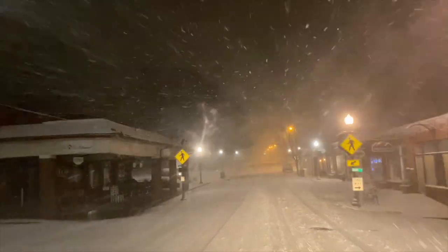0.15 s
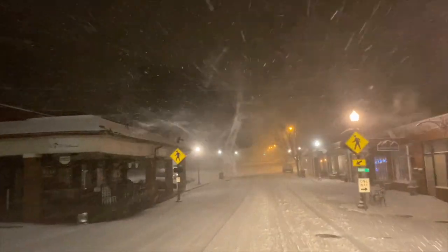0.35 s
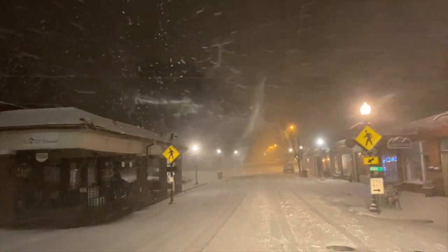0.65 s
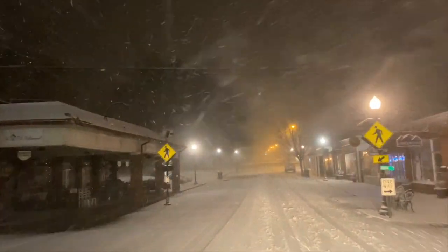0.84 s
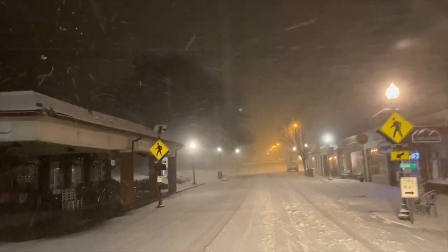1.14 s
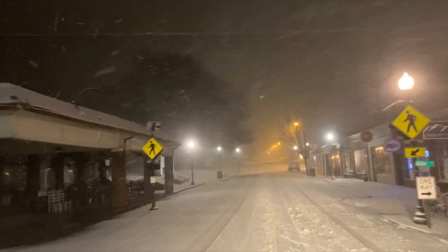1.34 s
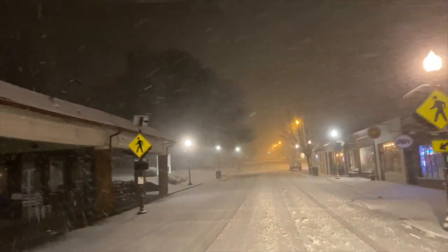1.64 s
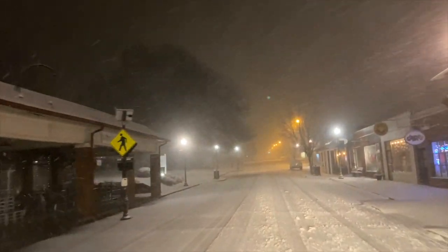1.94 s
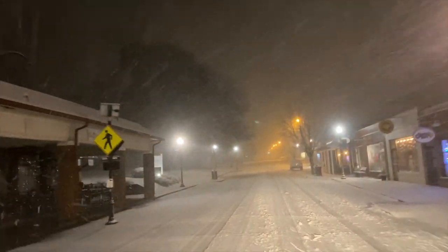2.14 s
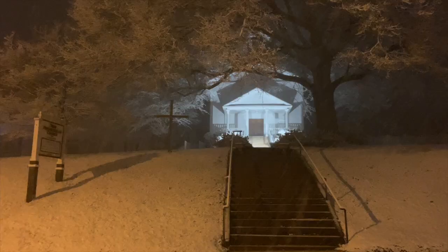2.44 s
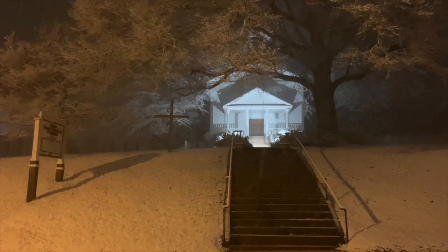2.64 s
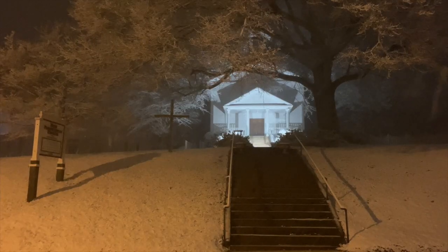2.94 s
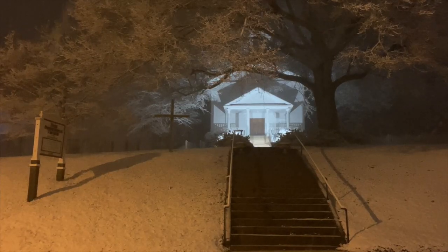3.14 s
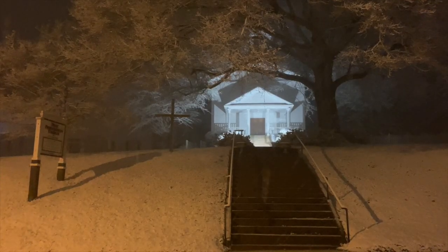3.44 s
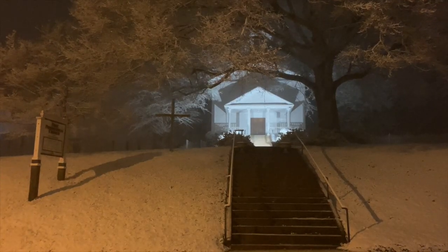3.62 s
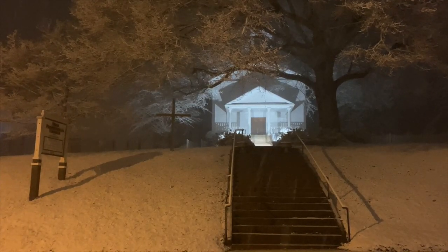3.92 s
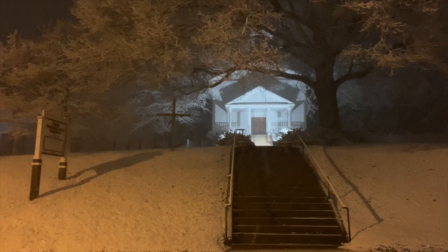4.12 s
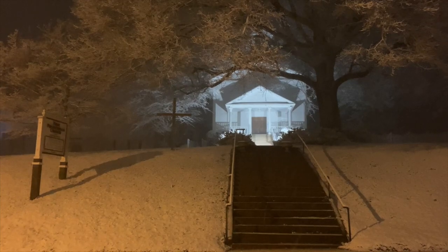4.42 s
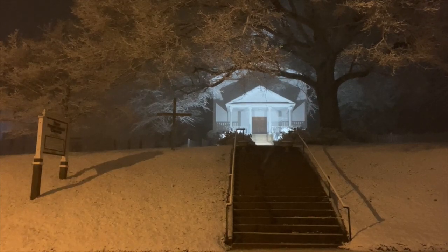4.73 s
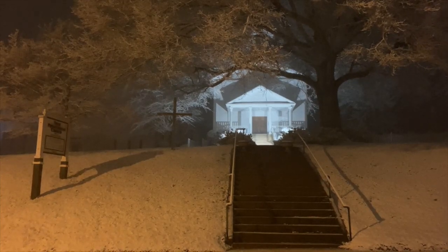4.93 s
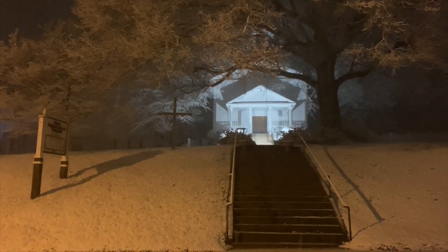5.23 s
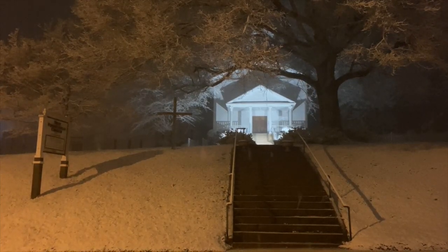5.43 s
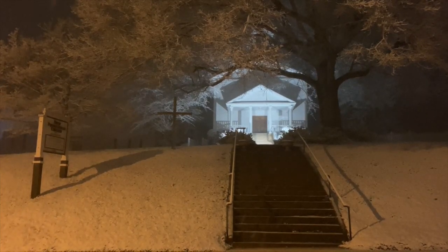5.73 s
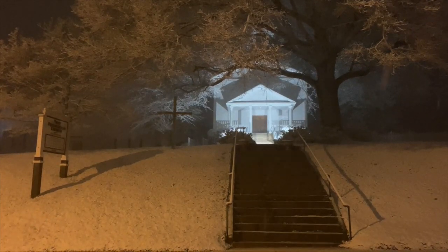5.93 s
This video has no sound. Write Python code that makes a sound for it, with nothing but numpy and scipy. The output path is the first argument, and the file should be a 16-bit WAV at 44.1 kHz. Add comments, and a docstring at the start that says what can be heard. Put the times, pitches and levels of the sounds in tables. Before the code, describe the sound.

Rough gusts thump and crackle over the mic during a snowstorm drive, abruptly replaced by a parked car's low idling hum and soft hush.

```python
"""Night snowstorm from a car

Place: an open window of a moving car. Microphone: the two ports of a phone, out in the wind.
Wind buffets the ports (noise bands driven by gusts and eddies), air hisses past and sleet ticks close by.
At 2.461 s it cuts hard to the parked car: a four-cylinder idle, summed from orders of the engine cycle,
over the noise hush of a snowy street. Sparse sleet and faint flakes still tick."""
import sys
import numpy as np
from scipy import signal
from scipy.fft import rfft, irfft, next_fast_len
from scipy.io import wavfile
from scipy.ndimage import uniform_filter1d

SR = 44100
rng = np.random.default_rng(int(sys.argv[2]) if len(sys.argv) > 2 else 0)


def persist_wave(psi):
    """Save psi, clipped to +-1, as 16-bit WAV."""
    counts = np.round(np.clip(psi, -1, 1) * 32767).astype(np.int16)
    wavfile.write(sys.argv[1], SR, np.atleast_2d(counts).T)


N = 267687
CUT_S = 2.461  # moving car before, parked car after

# wind on the ports: [t/s, level/dB, treble boost/dB]
WIND_GUSTS = [(0.0, -15.5, 1.5), (0.08, -16.5, 0), (0.14, -23, 6.5), (0.17, -11.5, -2.5), (0.3, -17, 4.5),
              (0.37, -22.5, 4.5), (0.43, -12.5, -5), (0.47, -30, 10.5), (0.52, -10.5, -4.5),
              (0.55, -22.5, 10.5), (0.6, -20, -1), (0.77, -24.5, 9), (0.84, -17, -4), (0.88, -27.5, 8),
              (1.04, -14.5, -4.5), (1.07, -27, 11.5), (1.14, -9.5, 1), (1.27, -17, -0.5), (1.4, -14, -4.5),
              (1.51, -21, 2.5), (1.64, -19.5, -5), (1.7, -26.5, 0), (1.76, -18, 0.5), (1.9, -21, -6),
              (2.07, -23.5, -2.5), (2.17, -18.5, -2.5), (2.25, -15, 0.5), (2.31, -20.5, 2), (2.35, -24, -4),
              (2.46, -27, -9)]
# bass of the wind, swelling on its own: [t/s, level/dB]
WIND_RUMBLE = [(0.0, -9), (0.09, -9), (0.14, -14.5), (0.32, -9.5), (0.38, -24.5), (0.44, -10.5),
               (0.48, -26.5), (0.53, -4), (0.61, -29), (0.67, -1), (0.78, -32), (0.85, -10), (0.88, -17.5),
               (1.15, -15), (1.21, -10.5), (1.62, -19), (1.68, -29), (1.82, -9), (1.88, -30), (1.93, -19.5),
               (2.13, -27.5), (2.3, -22.5), (2.46, -22)]
# relative spectrum of the wind: [f/Hz, density/dB per Hz]
WIND_SPECTRUM = [(12, -51.5), (25, -24), (41, -6.5), (65, 1.5), (110, -2), (156, -1.5), (202, -5.5),
                 (285, -6.5), (420, -11), (570, -10.5), (752, -14.5), (950, -19), (1220, -22), (1610, -24),
                 (1980, -33.5), (5000, -55), (6500, -68.5), (11000, -120)]
# eddies that burst on a port: [t/s, peak level/dB, brightness/dB, left minus right/dB, length/s]
PORT_EDDIES = [(0.007, -15.5, -6.5, 1, 0.052), (0.031, -8, -32, 9, 0.033), (0.072, 4, -15, -1.5, 0.021),
               (0.092, -5, -40, 16, 0.045), (0.152, -4, -6.5, -10.5, 0.019), (0.164, -1, -7.5, 0, 0.014),
               (0.188, -11, -31, 17, 0.069), (0.191, -8, -27, 0, 0.012), (0.248, -6, -5, -2, 0.03),
               (0.257, -14, -10, -2, 0.014), (0.288, -6, -12, 0, 0.042), (0.331, -12, -38, 36, 0.1),
               (0.37, -14, -15, -2, 0.02), (0.413, -1.5, -32, 17, 0.047), (0.433, -4, -18, -11, 0.018),
               (0.469, -18, -12, 2, 0.033), (0.511, -4.5, -20, 11, 0.018), (0.562, -8.5, -26, 2, 0.05),
               (0.585, -5.5, -20, -4, 0.025), (0.626, -4.5, -22, 30, 0.0077), (0.655, -10, -8, 4, 0.013),
               (0.662, -14.5, -1.5, 1, 0.029), (0.716, -6.5, -7.5, 5, 0.021), (0.75, -19, -11, 0, 0.013),
               (0.81, -19, -30, 4, 0.02), (0.904, -12, -16, 1, 0.018), (1.013, -7, -27, 4, 0.027),
               (1.078, -4.5, -24, -6.5, 0.071), (1.145, -7, -8, -3, 0.026), (1.171, -1.5, -8.5, 8.5, 0.016),
               (1.181, 1, -5, 8.5, 0.009), (1.193, -3.5, -3.5, 14, 0.014), (1.207, -2, -5, 12.5, 0.0074),
               (1.215, 1, -2, 10.5, 0.007), (1.223, -2, -8, 11, 0.007), (1.233, -9, -1, 11, 0.0094),
               (1.254, -7, -4, 3, 0.012), (1.275, -2.5, -9, 6.5, 0.011), (1.289, -9, -20, 6, 0.016),
               (1.325, -9, -7, 12, 0.012), (1.339, -4.5, -6, 14, 0.023), (1.354, -6, -5.5, 14, 0.029),
               (1.383, -10, -6, 16, 0.018), (1.422, -14.5, -8, 18, 0.087), (1.476, -10.5, -2.5, 17, 0.0057),
               (1.538, -5.5, -1.5, 15, 0.016), (1.552, -8, -15, 13, 0.031), (1.577, -18, -13, 13, 0.022),
               (1.599, -11, -11, 15, 0.015), (1.611, -11.5, -4, 15, 0.025), (1.629, -17, -8, 13, 0.011),
               (1.679, -9.5, -8.5, 12, 0.015), (1.704, -17, -4, 11, 0.013), (1.732, -10.5, -21, 6.5, 0.025),
               (1.774, -20, -2, 13, 0.058), (1.85, -11, -19, 5.5, 0.041), (1.922, -14.5, -8, 7.5, 0.058),
               (1.985, -18.5, 5, 2.5, 0.026), (2.046, -17, -8, 9, 0.02), (2.101, -13, -12, 9.5, 0.05),
               (2.11, -10.5, -15, 18, 0.018), (2.213, -10, -12, 12.5, 0.009), (2.233, -7, -10, 15, 0.016),
               (2.254, -14, -4, 6.5, 0.015), (2.274, -14, -4, 7, 0.019), (2.307, -16.5, -5, 3, 0.023),
               (2.371, -12.5, -11, 9, 0.033), (2.435, -20, 0, 5, 0.019)]
# air stream past the car: [t/s, level/dB, boost of the highest treble/dB]
AIR_STREAM = [(0, -42.5, 4), (.3, -40.5, 4), (.6, -45, 3.5), (.66, -48, -2), (.78, -48, -0.5),
              (.81, -41, 0), (.9, -41.5, -6), (1.05, -40.5, 0), (1.2, -41.5, -3), (1.6, -44, -2.5),
              (2.05, -40, -4.5), (2.3, -42.5, -5.5), (2.46, -42.5, -2.5)]
# relative spectrum of the air stream: [f/Hz, density/dB per Hz]
HISS_SPECTRUM = [(900, -35), (1700, -5), (2300, -12.5), (2800, -15), (3500, -14.5), (4800, -17),
                 (5500, -19.5), (6300, -18.5), (7200, -20), (8400, -17), (9500, -23.5), (10500, -27.5),
                 (11000, -33.5), (11500, -48), (13000, -54), (14500, -46.5), (16000, -58)]
# sleet ticks: [t/s, peak level before the stereo lean/dB, lowest f/Hz, highest f/Hz,
# left minus right/dB, crumble decay/s, crumble size against the click]
SLEET_TICKS = [(0.119, -32, 7000, 12000, 2, .0004, 0.1), (0.133, -29, 7000, 12000, -2, .0004, .15),
               (0.173, -31, 7500, 11000, 0, .0006, .2), (0.209, -33, 7500, 11000, 0, .0004, .15),
               (0.313, -26, 8000, 13000, 2, 0.0009, 0.3), (0.327, -10, 2010, 13100, 4, 0.0012, 0.13),
               (.433, -30, 7000, 14000, 0, 0.00054, 0.33), (0.443, -39, 8000, 14000, 0, .0004, .15),
               (0.518, -27.5, 6000, 13000, 0, .0006, 0.1), (0.6261, -15, 5970, 10500, -2, 0.0006, .2),
               (0.6268, -5.5, 350, 4000, 12, 0.001, .09), (0.628, -9, 150, 700, 0.5, 0.002, .05),
               (0.628, -17, 4800, 10500, 3, 0.0008, 0.43), (0.646, -45, 8010, 12000, 2, .0004, 0.2),
               (0.661, -21.5, 1987, 5530, 9, .0004, 0.14), (0.6927, -15.5, 900, 6900, 2, 0.00035, 0.47),
               (0.797, -25, 3000, 9700, -4, 0.0011, 0.33), (1.039, -18, 2980, 11100, 4, 0.0005, 0.26),
               (1.045, -20, 2000, 8000, 8, 0.0025, 0.24), (2.0627, -2.5, 2340, 8100, 7, 0.00053, 0.16),
               (2.4004, -17, 1270, 2200, 6.5, 0.002, 0.17), (2.4007, -10, 3000, 11300, 10.5, 0.0007, 0.12),
               (2.4705, -52, 3500, 11000, 0, 0.0006, 0.2), (2.7055, -34.5, 450, 4270, 9, 0.001, 0.12),
               (2.708, -42, 1000, 4600, 8, 0.0008, 0.12), (2.7058, -38, 350, 800, 1, 0.002, 0.1),
               (2.7081, -42, 600, 3000, 13, 0.00082, 0.15), (2.797, -72, 7900, 9400, -11, .001, 0.51),
               (2.848, -68, 7900, 9440, -10.5, .001, .4), (3.078, -63, 8000, 9000, -6.5, 0.0016, 0.37),
               (3.338, -56, 900, 6040, 3, .002, .35), (3.702, -63.5, 4500, 9450, -7, 0.00074, .3),
               (5.508, -63, 7860, 11000, -6, .001, 0.35), (5.522, -59.5, 1500, 4500, -0.5, .0008, 0.4),
               (5.757, -71, 5500, 6500, -5.5, .012, 3), (5.772, -69, 5500, 6600, -4.5, .01, 3),
               (5.853, -68, 7860, 10500, -8.5, 0.00091, 0.43)]
# phone case and port, as heard on the sleet: [f/Hz, level/dB]
CASE_RESPONSE = [(7000, -2.5), (8200, 1.5), (9300, 0), (10000, -2.5), (10600, -5.5), (11200, -14),
                 (12000, -16), (16000, -22.5)]
# speed of the idle: [t/s, engine cycles per s]
IDLE_SPEED = [(2.46, 15.65), (2.9, 15.64), (3.2, 15.57), (3.8, 15.61), (4.2, 15.57), (4.8, 15.59),
              (5.05, 15.5), (5.2, 15.62), (5.5, 15.73), (6.07, 15.71)]
# orders of the engine: [multiple of the engine cycle, relative level/dB]
ENGINE_ORDERS = [(2, -16.5), (3, -26), (4, 1), (5, -13), (6, -3.5), (7, -17.5), (8, -18), (9, -27),
                 (10, -14.5), (12, -13), (14, -26), (15, -30), (20, -32)]
# heavier beats of the engine: [t/s, boost/dB, length/s]
HEAVY_BEATS = [(3.231, 7, 0.022), (3.41, 2, 0.018), (5.467, 4.5, 0.011), (6.027, 1.5, 0.022)]
# relative spectrum of the street hush: [f/Hz, density/dB per Hz]
STREET_SPECTRUM = [(16, -27.5), (31, -13.5), (68, -12), (140, -15.5), (200, -21), (250, -19), (325, -21.5),
                   (410, -27), (540, -26.5), (750, -32), (1000, -35), (1600, -41.5), (2500, -46.5),
                   (4000, -51), (4800, -57.5), (6000, -59.5), (7500, -67), (8100, -61.5), (8800, -66),
                   (11400, -78), (12000, -72), (12600, -82), (14500, -105)]
# likeness of the two ports, moving and parked: [f/Hz, share 0-1]
MOVING_LIKENESS = [(200, .965), (350, .9), (600, .5), (800, .45), (1050, .7), (1600, .35), (3000, .4),
                   (6000, .6), (9500, .87)]
PARKED_LIKENESS = [(100, 1), (260, .88), (500, 0.45), (750, .5), (1500, .3), (2500, 0.2), (6000, 0.25),
                   (10000, .05)]
# phase of left over right, moving and parked: [f/Hz, phase/rad]
MOVING_PHASE = [(0, 0), (260, -.05), (430, -.4), (700, -2.8), (1050, -4.7), (2400, -5.6), (4500, -5.7),
                (6030, -5.9), (7750, -8.3), (9500, -11.7), (10800, -13.6)]
PARKED_PHASE = [(0, 0), (340, -.2), (780, -3.3), (1460, -2.6), (2410, -5.2), (3100, -6.1)]
# stereo tilt by pitch, moving and parked: [f/Hz, left minus right/dB]
MOVING_TILT = [(100, -1), (400, -0.9), (800, 0), (3000, 1), (6000, 4.5), (8000, 0), (10500, -0.5),
               (12500, -4.5)]
PARKED_TILT = [(60, 7), (110, -6), (190, -8.5), (340, 2.5), (600, -2), (1070, -2.5), (1910, 0), (3400, 1.5),
               (6060, 0.5), (10800, -11)]

RUMBLE_HZ, TREBLE_HZ = (65, 160), (450, 2480)  # bass fades into the gust; treble boost grows to full
TURN_S, TURN_LENGTH_S = 1.11, 0.061  # the wind swings round to the left port
LEFT_BEFORE_DB, LEFT_AFTER_DB = -3.5, 9.5  # left minus right, before it is shared out by pitch
EDDY_CREST_DB, USUAL_BRIGHT_DB = 3.5, -11.5  # peak of an eddy over its mean level; brightness of plain wind
SLEET_EVEN_HZ = (6500, 8450)  # over this range the left lean of a tick fades out
IDLE_DB, STREET_DB = -38, -50
FIRING_S = 2.6241  # the engine cycle starts at zero phase here
FLAKES_PER_S = 4
FLAKE_DB, FLAKE_SCATTER_DB, FLAKE_LEFT_DB = -73, 2.5, -10  # peak, its spread, left minus right
CEILING, TOP_HZ = .93, 15900  # phone: level that peaks bend towards, top of its band


def buffet(t):
    """Turbulence on the ports: every band follows the gust, bursts with the eddies and churns at random."""
    s, level_db, boost_db = np.transpose(WIND_GUSTS)
    gust_db, treble_db = np.interp(t, s, level_db), np.interp(t, s, boost_db)
    rumble_db = np.interp(t, *np.transpose(WIND_RUMBLE))
    turn_ends = (TURN_S - TURN_LENGTH_S / 2, TURN_S + TURN_LENGTH_S / 2)
    pan_db = np.interp(t, turn_ends, (LEFT_BEFORE_DB, LEFT_AFTER_DB))

    noise = unit(colour(rng.standard_normal((2, len(t))), WIND_SPECTRUM))
    air = ports(noise, MOVING_LIKENESS, MOVING_PHASE, MOVING_TILT)
    _, eddy_db, bright_db, left_db, _ = np.transpose(PORT_EDDIES)
    humps = np.array([hump(t, start - .001, length) ** 2 for start, *_, length in PORT_EDDIES])
    churn = np.tanh(0.55 * walk(len(t), 170))
    spits = np.tanh(0.33 * walk(len(t), 450))
    thumps = np.tanh(0.67 * walk(len(t), 35))
    side = np.array([[.35], [-.65]])  # left and right share of a lean

    centres = 40 * 2 ** np.arange(0, 7.1, 1 / 3)
    out = 0
    for hz, band in zip(centres, bands(air, centres)):
        deep = np.interp(np.log(hz), np.log(RUMBLE_HZ), (1, 0))
        sharp = np.interp(np.log(hz), np.log(TREBLE_HZ), (0, 1))
        # only short wavelengths differ between the ports
        apart = np.interp(hz, (700, 900), (0, 1)) * side
        bright = np.interp(hz, (900, 2500), (0, 1))
        reach = np.interp(hz, (80, 450), (0, 1))

        # doubled dB, since these are powers
        wind_db = deep * rumble_db + (1 - deep) * gust_db + sharp * treble_db + apart * pan_db
        burst_db = eddy_db - EDDY_CREST_DB + bright * (bright_db - USUAL_BRIGHT_DB) + apart * left_db
        power = undb(2 * wind_db) + (reach * undb(2 * burst_db)) @ humps

        churn_db = np.interp(hz, (60, 500, 3000), (4, 4.5, 4.5)) * churn
        churn_db = churn_db + 1.3 * walk(len(t), hz / 16 + 6)
        # the largest swirls thump through all the bass at once
        churn_db = churn_db + np.interp(hz, (120, 300), (2.5, 0)) * thumps
        # the smallest swirls spit in very short bursts
        churn_db = churn_db + np.interp(hz, (900, 2500), (0, 7.5)) * spits
        out = out + band * np.sqrt(power) * undb(churn_db)
    return out


def engine(t):
    """Idle: orders of the engine cycle, each wavering as firings differ, and a few heavier beats."""
    cycles = np.cumsum(np.interp(t, *np.transpose(IDLE_SPEED)) / SR)
    cycles = cycles - np.interp(FIRING_S, t, cycles)
    hum = 0
    for k, db in ENGINE_ORDERS:
        waver = 1 + .07 * walk(len(t), 12) + .07j * walk(len(t), 12)
        # the exhaust delays higher orders by a growing angle
        turning = np.exp(2j * np.pi * k * cycles - 1j * k ** 2 / 5)
        hum = hum - undb(db) * np.real(waver * turning)
    hum = unit(hum) * undb(IDLE_DB)
    for s, db, length in HEAVY_BEATS:
        hum = hum * undb(db * np.exp(-((t - s) / length) ** 2 * 2))
    return hum * undb([[-.5], [.5]])  # right port 1 dB louder


def sleet():
    """Each grain is a click with a tiny crumble, ringing in its own band and heard through the case."""
    out = np.zeros((2, N))
    t = (np.arange(1024) - 256) / SR
    hz = np.arange(513) * SR / 1024
    turn = np.exp(-1j * np.interp(hz, *np.transpose(MOVING_PHASE)))
    tilt = undb(on_log(hz, MOVING_TILT[-2:]) / 2)  # only the treble end of the tilt
    noises = rng.standard_normal((len(SLEET_TICKS), 2, 1024))
    for (s, db, low_hz, high_hz, left_db, length, crumble), noise in zip(SLEET_TICKS, noises):
        ring = signal.butter(3, (low_hz, high_hz), "bandpass", fs=SR, output="sos")
        crack = (t == 0) + crumble * noise * (t > 0) * np.exp(-np.abs(t) / length)
        crack = colour(signal.sosfilt(ring, crack), CASE_RESPONSE)
        crack = crack / abs(crack).max()
        # a lean to the left fades in the treble, a lean to the right does not
        lean_share = np.interp(hz, SLEET_EVEN_HZ, (1, 0)) if left_db > 0 else 1
        lean = undb(left_db / 2 * lean_share)
        crack = irfft(rfft(crack) * np.array([lean * tilt, turn / lean / tilt]), 1024)
        i = int(s * SR) - 256
        out[:, i:i + 1024] += undb(db) * crack * signal.windows.tukey(1024, .4)
    return out


def stream(t):
    """Hiss of air past the car: shaped noise, patchy from band to band."""
    s, level_db, top_db = np.transpose(AIR_STREAM)
    top_db = np.interp(t, s, top_db)
    noise = unit(colour(rng.standard_normal((2, len(t))), HISS_SPECTRUM))
    air = ports(noise, MOVING_LIKENESS, MOVING_PHASE, MOVING_TILT)
    centres = 1600 * 2 ** np.arange(0, 3.1, 1 / 3)
    out = 0
    for hz, band in zip(centres, bands(air, centres)):
        patchy_db = 1.5 * walk(len(t), 9) + 1.5 * walk(len(t), 40)
        out = out + band * undb(np.interp(hz, (6500, 8500), (0, 1)) * top_db + patchy_db)
    return out * undb(np.interp(t, s, level_db))


def street(t):
    """Soft hush of the street: shaped noise whose bands flicker a little."""
    noise = unit(colour(rng.standard_normal((2, len(t))), STREET_SPECTRUM))
    air = ports(noise, PARKED_LIKENESS, PARKED_PHASE, PARKED_TILT)
    parts = bands(air, 50 * 2 ** np.arange(0, 8., .5))
    return undb(STREET_DB) * sum(part * undb(1.1 * walk(len(t), 20)) for part in parts)


def flakes():
    """Tiny high ticks by the parked car: band-passed noise at uneven moments that dies within a few ms."""
    out = np.zeros((2, N))
    t = np.arange(512) / SR
    ring = signal.butter(3, (7900, 10300), "bandpass", fs=SR, output="sos")
    count = int((N / SR - CUT_S) * FLAKES_PER_S)
    starts = rng.integers(int(CUT_S * SR), N - 512, count)
    sizes = rng.standard_normal(count)
    noises = rng.standard_normal((count, 2, 512))
    lean_db = np.array([[FLAKE_LEFT_DB / 2], [-FLAKE_LEFT_DB / 2]])
    for i, size, noise in zip(starts, sizes, noises):
        tick = signal.sosfilt(ring, noise * t * np.exp(-t / .0015))
        db = FLAKE_DB + FLAKE_SCATTER_DB * size + lean_db
        out[:, i:i + 512] += tick / abs(tick).max() * undb(db)
    return out


def ports(pair, alike, lead, tilt):
    """Stereo of the two ports: right holds part of the left sound, phase shifted, and part of a twin."""
    n = pair.shape[-1]
    hz = np.arange(n // 2 + 1) * SR / n
    share = np.clip(on_log(hz, alike), 0, 1)
    left, twin = rfft(pair)
    turn = np.exp(-1j * np.interp(hz, *np.transpose(lead)))
    lean = undb(on_log(hz, tilt) / 2)
    right = share * turn * left + np.sqrt(1 - share ** 2) * twin
    return irfft(np.array([left * lean, right / lean]), n)


def hump(t, start, length):
    """Swell of one eddy: quick rise, rounded top, firm end."""
    return np.sin(np.pi * np.clip((t - start) / length, 0, 1) ** .45)


def walk(n, rate):
    """Random levels held 1 / rate s and slewed twice; spread 1."""
    k = max(int(SR / rate), 2)
    steps = np.repeat(rng.standard_normal(n // k + 1), k)
    return unit(uniform_filter1d(uniform_filter1d(steps, k), k)[:n])


def bands(x, centres_hz):
    """Splits rows into overlapping bands that sum to the whole."""
    n = x.shape[-1]
    log_hz = np.log(np.arange(n // 2 + 1) * SR / n + 1)
    place = np.interp(log_hz, np.log(centres_hz), np.arange(len(centres_hz)))
    spectrum = rfft(x)
    return [irfft(spectrum * np.clip(1 - abs(place - k), 0, 1), n) for k in range(len(centres_hz))]


def colour(x, spectrum):
    """Shapes the rows of x by a (f/Hz, level/dB) table."""
    n = x.shape[-1]
    return irfft(rfft(x) * undb(on_log(np.arange(n // 2 + 1) * SR / n, spectrum)), n)


def on_log(hz, table):
    """Value of a (f/Hz, value) table on a log-frequency axis."""
    f, v = np.transpose(table)
    return np.interp(np.log(hz + 1), np.log(f + 1), v)


def unit(x):
    """Scales each row to an RMS of 1."""
    return x / np.sqrt(np.mean(x ** 2, axis=-1, keepdims=True))


def undb(db):
    """Amplitude factor of a level in dB."""
    return 10 ** (np.asarray(db) / 20)


def scene():
    """Moving car, hard cut, parked car; ticks of sleet and flakes are laid on top."""
    t = np.arange(N) / SR
    cut = int(CUT_S * SR)
    # lengths rounded up for fast transforms, trimmed afterwards
    n = next_fast_len(cut, real=True)
    m = next_fast_len(N - cut, real=True)
    later = CUT_S + np.arange(m) / SR
    moving = (buffet(t[:n]) + stream(t[:n]))[:, :cut]
    moving = moving * np.clip((CUT_S - t[:cut]) / 0.0011, 0, 1)  # 1.1 ms fade out
    parked = (engine(later) + street(later))[:, :N - cut]
    parked = parked * np.clip((t[cut:] - CUT_S) / 0.01, 0, 1)  # 10 ms fade in
    return np.concatenate([moving, parked], axis=1) + sleet() + flakes()


def record(dry):
    """The phone rounds the loudest peaks and cuts the top."""
    rounded = dry / (1 + (dry / CEILING) ** 4) ** (1 / 4)
    top_cut = signal.ellip(8, .2, 70, TOP_HZ, fs=SR, output="sos")  # 0.2 dB ripple, 70 dB stop
    return signal.sosfilt(top_cut, rounded)


dry = scene()
out = record(dry)
persist_wave(out)
```